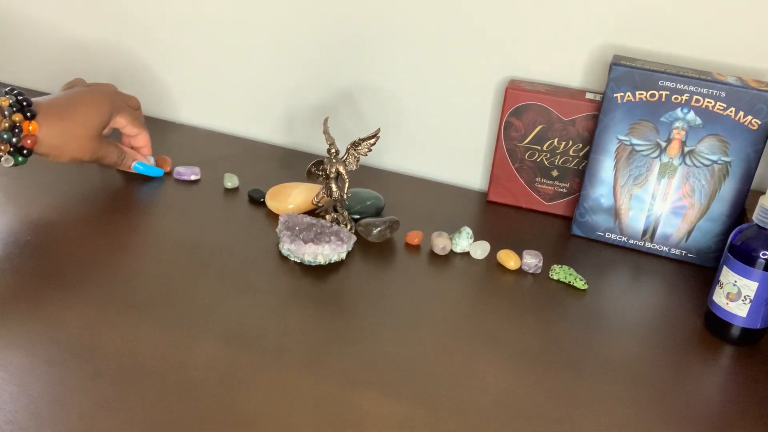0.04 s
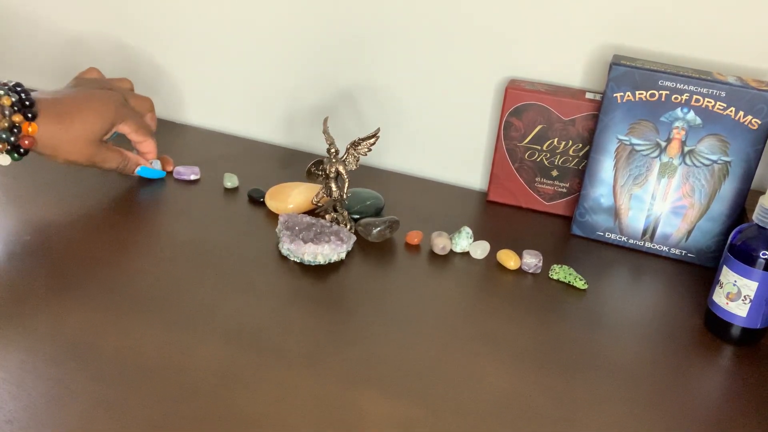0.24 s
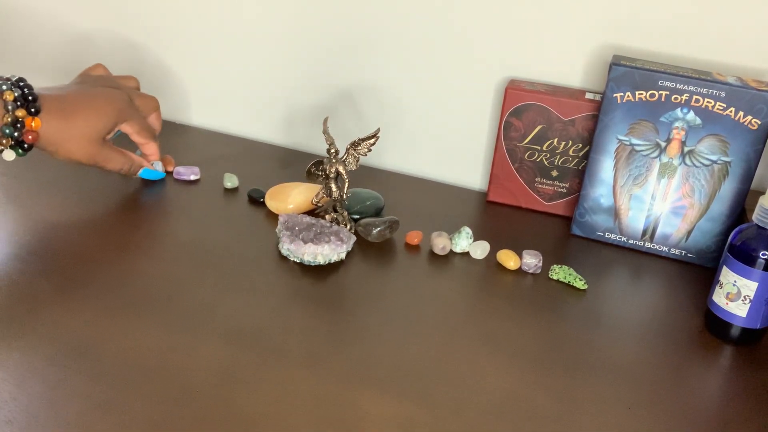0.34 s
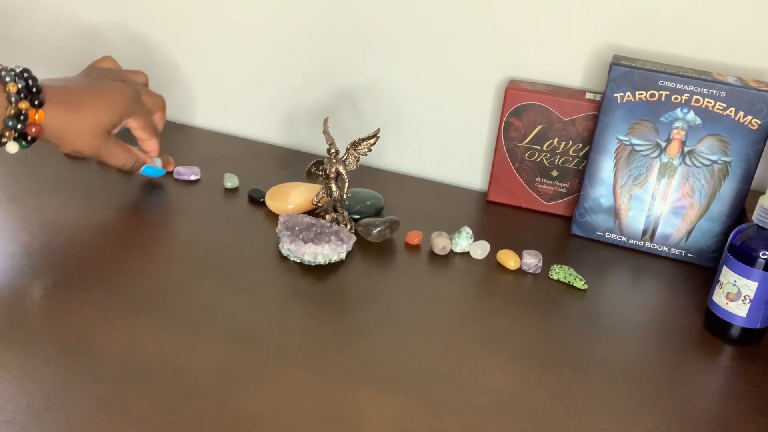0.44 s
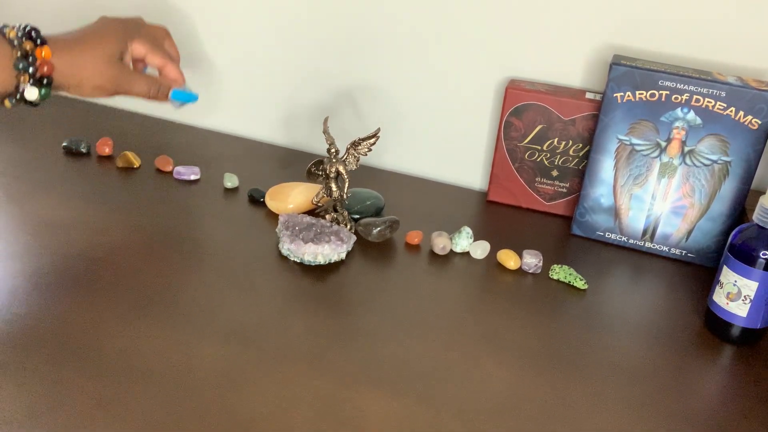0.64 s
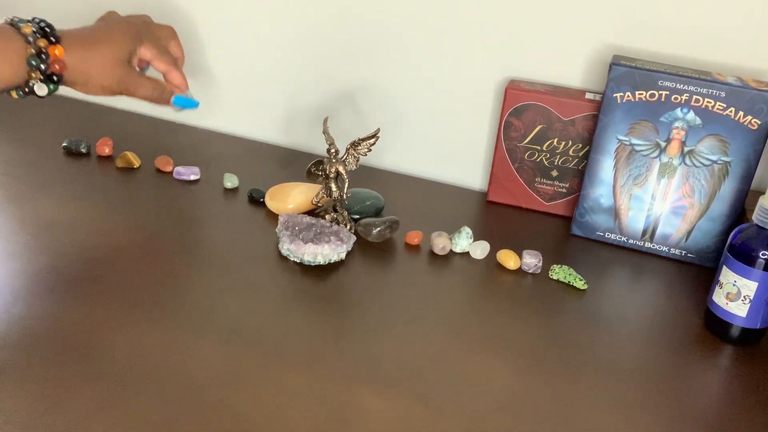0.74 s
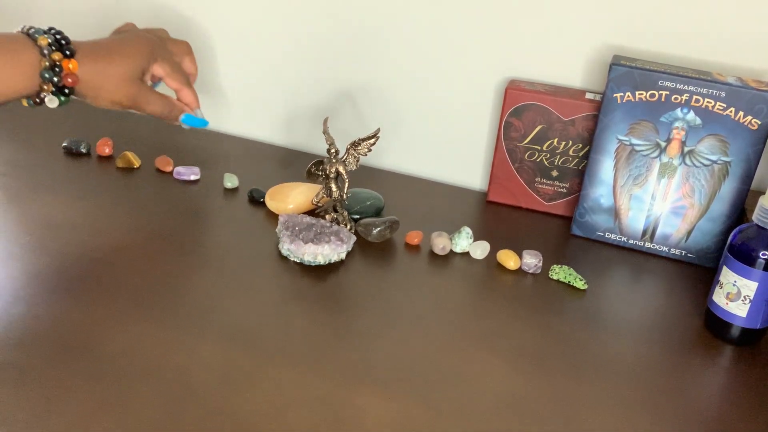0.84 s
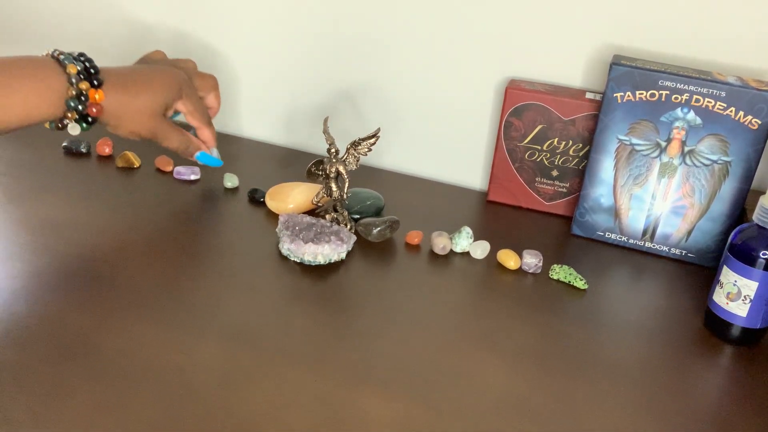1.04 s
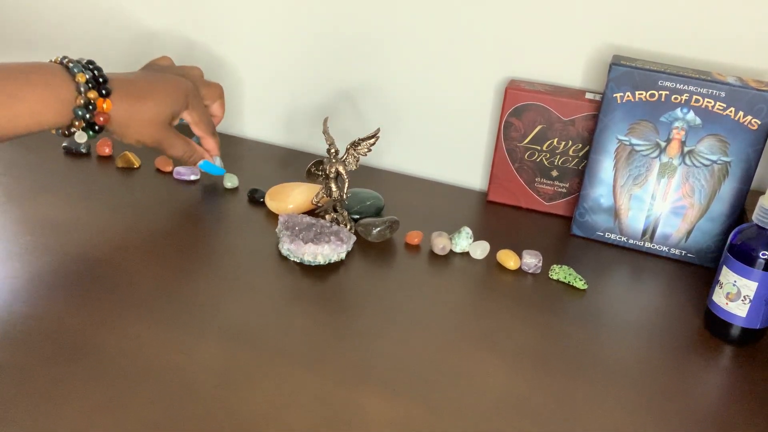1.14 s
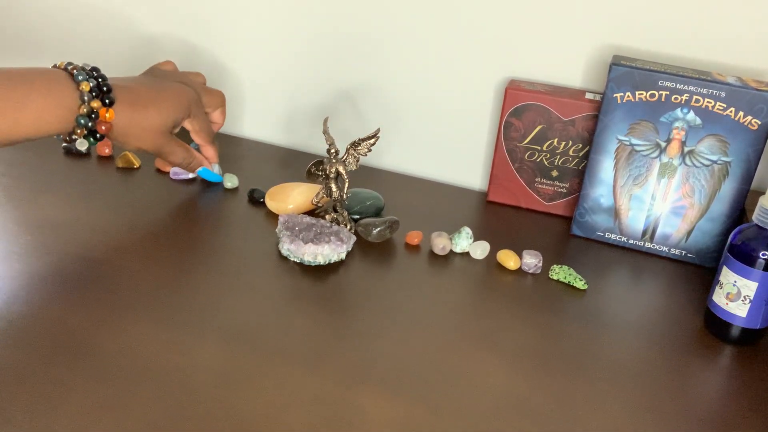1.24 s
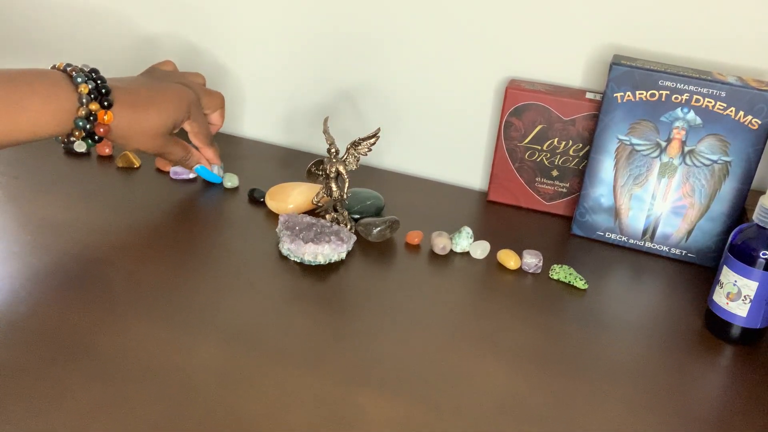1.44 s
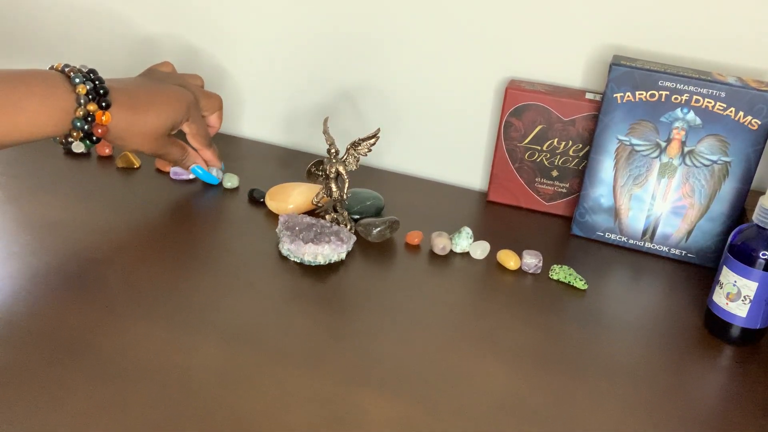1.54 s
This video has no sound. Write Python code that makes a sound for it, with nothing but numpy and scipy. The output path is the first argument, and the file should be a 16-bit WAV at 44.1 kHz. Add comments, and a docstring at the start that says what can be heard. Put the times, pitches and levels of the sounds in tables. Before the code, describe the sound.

A small polished stone clacks hard on a wooden desk, then is set down again indoors

```python
"""Over a low hum and air noise, fingers rub (slowly shaped noise) and tick (bright filtered impulses).
A polished stone then clacks on a wooden desk, lightly and then hard, and rattles down to faint contacts.
It is set down again, rattling to rest in a few contacts; near the end the hand settles with a soft thud.
Each contact is a minimum-phase click; each landing adds decaying desk modes; the heavy ones a low swell.
The quiet room answers with early reflections and a tail that decays at its own rate in each band."""
import sys
import numpy as np
from scipy import signal
from scipy.fft import rfft, irfft
from scipy.io import wavfile
from scipy.ndimage import uniform_filter1d

SR = 44100
rng = np.random.default_rng(int(sys.argv[2]) if len(sys.argv) > 2 else 0)


def file_out(sig):
    """Save sig as 16-bit WAV at sys.argv[1]."""
    # one column per channel
    cols = np.atleast_2d(sig).T
    # limit, then scale
    lim = np.clip(cols, -1, 1)
    pcm = np.round(lim * 32767).astype(np.int16)
    wavfile.write(sys.argv[1], SR, pcm)


N = 70560  # length in samples (1.6 s)


def amp(db):
    """Level: an amplitude ratio is ten to the power of decibels over twenty."""
    return 10 ** (np.asarray(db) / 20)


def evened(x):
    """Normalisation: dividing by the root mean square gives unit power."""
    return x / np.sqrt(np.mean(x ** 2) + 1e-20)


def read(points, hz, column=1):
    """Spectral envelope: a table column is interpolated along log frequency."""
    table = np.transpose(points)
    return np.interp(np.log(hz + 1), np.log(table[0] + 1), table[column])


def add(mix, start_s, sound):
    """Superposition: a sound is summed into the mix, in place, from its start time."""
    part = mix[round(start_s * SR):][:len(sound)]
    part += sound[:len(part)]


def ring(x, response):
    """Linear response: a sound is convolved with an impulse response."""
    return signal.fftconvolve(x, response)[:N]


def click(colour, cut_hz=SR, size=2048):
    """Minimum phase: the Hilbert transform of log gain gives the phase of a causal click."""
    hz = abs(np.fft.fftfreq(size, 1 / SR))
    softening = np.sqrt(1 + (hz / cut_hz) ** 8)  # a softer contact has a lower cut-off
    log_gain = np.log(amp(read(colour, hz)) / softening)
    spectrum = np.exp(np.conj(signal.hilbert(log_gain)))
    return np.fft.ifft(spectrum).real


def noise(colour):
    """Filtered noise: white noise is weighted by a spectral envelope and set to rms 1."""
    gain = amp(read(colour, np.fft.rfftfreq(N, 1 / SR)))
    return evened(irfft(rfft(rng.standard_normal(N)) * gain, N))


def dying(t, t60):
    """Exponential decay: the amplitude falls by 60 dB in each t60."""
    return np.exp(-np.log(1000) * t / t60)


def scatter(t60, delay_s):
    """Diffuse scattering: decaying impulses of random sign form a response of energy 1."""
    t = np.arange(SR // 2) / SR
    tail = rng.choice([-1., 1.], len(t)) * dying(t, t60) * (t > delay_s)
    return tail / np.linalg.norm(tail)


# Clicks of stone on wood as it rocks to rest.
# Each row: start in seconds, strength in dB, hardness as a cut-off in Hz.
STONE_CONTACTS = [(0.1101, 0, 13000), (0.11095, -15, 12000), (0.11706, -8.5, 7100), (0.1209, -5.5, 7160),
                  (0.2210, 18, 5900), (0.22422, 16.5, 5500), (0.22633, 15, 5030), (0.22694, 14, 8000),
                  (0.22771, 14, 5600), (0.22876, 15.5, 4960), (0.2298, 4, 4500), (0.23123, 19, 4490),
                  (0.23368, 7, 3800), (0.4796, -8, 3503), (0.48164, -11, 2800), (0.48708, -18.5, 2410),
                  (0.49232, -13.5, 2630), (0.49348, -9.5, 2240), (0.639, -26, 2970), (0.645, -29.5, 2210),
                  (0.719, -30, 3000), (0.799, -22, 2200), (0.894, -32, 4500), (0.933, -34, 2200),
                  (0.98, -33, 4496), (1.1929, 11, 6990), (1.1939, 1.5, 11000), (1.19916, 4, 6160),
                  (1.20122, 2, 5600), (1.2018, -1, 5450), (1.2087, 8.5, 6000), (1.2095, -3, 4400),
                  (1.21528, 3.5, 4500), (1.22054, 1, 4000), (1.2245, 4, 3800), (1.2266, -7, 3400),
                  (1.4810, -5.5, 2500), (1.4842, -11.5, 1900), (1.48501, -6, 1670), (1.4878, -11.5, 1700),
                  (1.4925, -3, 1600), (1.5808, -18, 2230)]
# Spectrum of one bare clack. Each row: frequency in Hz, level in dB.
CLACK_COLOUR = [(40, -50.5), (200, -24), (340, -12), (900, -9), (1500, -4), (2200, 0.5), (3100, -5),
                (4100, -9), (5100, -7.5), (6500, -18.5), (9000, -14), (12000, -23.5), (16000, -32.5)]
SCATTER_DB, SCATTER_T60_S, SCATTER_DELAY_S = -4, 0.025, 0.00037


def stone(paths=4):
    """Impact excitation: each contact is a click, and successive clicks take different room paths."""
    clacks = np.zeros((paths, N))
    for k, (start_s, db, hard_hz) in enumerate(STONE_CONTACTS):
        add(clacks[k % paths], start_s, amp(db) * click(CLACK_COLOUR, hard_hz))
    total = np.zeros(N)
    for clack in clacks:
        scattered = ring(clack, scatter(SCATTER_T60_S, SCATTER_DELAY_S))
        total += clack + amp(SCATTER_DB) * scattered + room(clack)
    return disperse(total)


# Bands that the wood holds back. Each row: centre frequency in Hz, width in Hz.
WOOD_DISPERSION = [(2250, 2800), (5000, 1200), (9000, 1100)]


def disperse(x):
    """Dispersion: all-pass sections delay some bands, spreading a sharp click into a few swings."""
    for hz, width_hz in WOOD_DISPERSION:
        radius = np.exp(-np.pi * width_hz / SR)
        poles = [1, -2 * radius * np.cos(2 * np.pi * hz / SR), radius * radius]
        x = signal.lfilter(poles[::-1], poles, x)
    return x


# The stone's weight lands on the desk. Each row: start in seconds, strength in dB, hardness as
# a cut-off in Hz, spot on the desk (rounded to an index 0 to 3; -4 also means spot 0).
DESK_LANDINGS = [(0.11, 1.5, 7000, 0.5), (0.2212, 23.5, 6540, 1), (0.479, -16, 2610, -4),
                 (0.4930, -4, 2100, 0), (1.1929, 13, 6850, 2), (1.4807, -3.5, 2400, 3),
                 (1.581, -10, 1600, 1.5)]
WOOD_ROOM_DB = -1.5  # room response to the ringing wood
BOOM_HZ, BOOM_RISE_S = 136.3, 0.029
BOOM_DB, BOOM_GROWTH = -50, 0.31  # level at strength 0 dB, and dB gained per dB of strength


def landings():
    """Modal excitation: landings ring the desk top; the heavy ones swell a low room resonance."""
    wood, boom = np.zeros((2, N))
    t = np.arange(SR // 2) / SR
    envelope = t / BOOM_RISE_S * np.exp(1 - t / BOOM_RISE_S)
    swell = envelope * np.sin(2 * np.pi * BOOM_HZ * t)
    flat = [(0, 0), (SR, 0)]
    for start_s, db, hard_hz, spot in DESK_LANDINGS:
        blow = click(flat, hard_hz)
        add(wood, start_s, amp(db) * signal.fftconvolve(blow, desk(round(spot))))
        if db > 6:
            add(boom, start_s, amp(BOOM_DB + BOOM_GROWTH * db) * swell)
    return disperse(wood + amp(WOOD_ROOM_DB) * room(wood)) + boom


# Modes of the desk top. Each row: frequency in Hz, t60 in seconds,
# then the level in dB at spots 0, 1, 2 and 3.
DESK_MODES = [(335, .08, -6.5, 2, 0.5, -12), (400, 0.054, -8.5, -2, -2.5, -16), (506, .08, -2.5, 1, 3.5, 5),
              (700, .06, -10, 1, -6.5, -2), (751, .25, 8, -9.5, 9, 12), (998, .07, -10, -2.5, -4, 2),
              (1163, .09, -12.5, -4, 5.5, 12.5), (1335, .09, 1, 3.5, 8.5, 7), (1539, .06, -0.5, 2, 0.5, 8),
              (1774, 0.13, 8.5, -2, 5, 8), (1870, .07, 7.5, 4.5, 6, -14), (2039, .07, 1.5, 11.5, -10, 3.5),
              (2282, .08, 7.5, 1.5, 11, -3), (2535, .07, 4.5, 2.5, -1, -6), (2838, .08, 4, 5.5, -10, -7),
              (3350, .08, 3.5, -3.5, 8.5, 2), (4904, .045, -8.5, 1, -11.5, -18)]


def desk(spot):
    """Modal superposition: decaying cosines are weighted by spot; neighbouring modes swing oppositely."""
    t = np.arange(SR // 2) / SR
    response = np.zeros(len(t))
    for k, (hz, t60, *spot_dbs) in enumerate(DESK_MODES):
        gain = (-1) ** k * amp(spot_dbs[spot])
        gain *= 2 * np.log(1000) / (t60 * SR)  # evens out the resonant gain of long and short modes
        response += gain * dying(t, t60) * np.cos(2 * np.pi * hz * t)
    return response


# Light ticks of fingernail and beads. Each row: start in seconds, level in dB.
TICK_EVENTS = [(0.124, -16), (0.1784, -35), (0.198, -32), (0.543, -42), (0.5573, -23), (0.639, -39),
               (0.657, -42), (0.666, -40), (0.731, -44.5), (0.799, -43.5), (0.866, -36.5), (0.895, -45),
               (0.9624, -38.5), (0.98, -40.5), (1.0795, -41), (1.105, -42.5), (1.3792, -30.5)]
# Spectrum of one tick. Each row: frequency in Hz, level in dB.
TICK_COLOUR = [(300, -29), (2000, -18), (5000, -16), (6800, -3.5), (10000, -0.5), (12500, -13.5),
               (16000, -30.5)]
TICK_RING_DB, TICK_RING_T60_S = -6.5, 0.015


def ticks():
    """Light impact: tiny bright clicks excite a brief diffuse ring."""
    out = np.zeros(N)
    for start_s, db in TICK_EVENTS:
        add(out, start_s, amp(db) * click(TICK_COLOUR))
    return out + amp(TICK_RING_DB) * ring(out, scatter(TICK_RING_T60_S, 0))


# Fingers rubbing. Each row: time in seconds, level in dB.
RUB_LEVEL = [(0, -62), (0.07, -57.5), (0.095, -53.5), (0.125, -44.5), (0.2, -61), (0.5, -62), (0.65, -73),
             (0.98, -75), (1.03, -104), (1.17, -76.5), (1.38, -56), (1.46, -64), (1.6, -60.5)]
# Spectrum of the rubbing. Each row: frequency in Hz, level in dB.
RUB_SPECTRUM = [(100, -22.5), (500, -1), (800, 7.5), (2100, 1.5), (3500, -10), (6000, -23), (10000, -23.5),
                (16000, -42)]
THUD_S, THUD_HZ, THUD_DB = 1.588, 190, -39  # the hand settles on the desk
THUD_RISE_S, THUD_T60_S = 0.007, 0.15


def hand():
    """Friction and damped oscillation: rubbing is shaped noise, the settling hand a decaying sine."""
    t = np.arange(N) / SR
    out = noise(RUB_SPECTRUM) * amp(np.interp(t, *np.transpose(RUB_LEVEL)))
    envelope = np.minimum(t / THUD_RISE_S, 1) * dying(t, THUD_T60_S)
    add(out, THUD_S, amp(THUD_DB) * envelope * np.sin(2 * np.pi * THUD_HZ * t))
    return out


# Spectrum of bracelet beads and skin. Each row: frequency in Hz, level in dB.
RUSTLE_COLOUR = [(200, -10.5), (1000, -1), (2500, -0.5), (5000, -8), (9000, -8.5), (12000, -18.5),
                 (16000, -32)]
RUSTLE_PER_S, RUSTLE_SPREAD_DB, RUSTLE_DB = 45, 3.5, -78.5  # mean rate, size spread, rms level


def rustle():
    """Random point process: sparse grains of uneven size make very faint crackles."""
    sizes = amp(RUSTLE_SPREAD_DB * np.minimum(rng.exponential(1, N), 2))
    grains = (rng.random(N) < RUSTLE_PER_S / SR) * sizes
    crackle = ring(grains, click(RUSTLE_COLOUR))
    return amp(RUSTLE_DB) * evened(ring(crackle, scatter(TICK_RING_T60_S, 0)))


# Reverberation of the room. Each row: frequency in Hz, t60 in seconds, level in dB.
ROOM_BANDS = [(129.7, 1, -7), (350, 0.52, -10.5), (850, 0.51, -6.5), (1800, 0.46, -9.5), (3200, .48, -13),
              (5200, .5, -15), (8100, 0.41, -11), (14000, .3, -13.5)]
ROOM_DELAY_S, EARLY_DB, EARLY_T60_S = 0.0063, -11.5, 0.22


def room(x, size=256):
    """Reverberation: early reflections join a diffuse tail with its own decay in each band."""
    hz, t, bands = signal.stft(rng.standard_normal(SR), SR, nperseg=size)
    t60 = read(ROOM_BANDS, hz)[:, None]
    level = amp(read(ROOM_BANDS, hz, column=2))[:, None]
    energy_scale = np.sqrt(2 * np.log(1000) / (t60 * SR))  # equal energy for any t60
    tail = signal.istft(bands * dying(t, t60) * level * energy_scale, SR, nperseg=size)[1]
    tail = tail * (np.arange(len(tail)) / SR > ROOM_DELAY_S)
    early = scatter(EARLY_T60_S, ROOM_DELAY_S)
    return ring(x, tail) + amp(EARLY_DB) * ring(x, early)


# Rumble and hiss of the room. Each row: frequency in Hz, relative level in dB per Hz.
AIR_COLOUR = [(12, -28.5), (20, 5), (58, -11.5), (70, -21), (130, -23), (198, -31.5), (228, -25.5),
              (270, -28.5), (367, -27), (849, -39.5), (1000, -43), (1220, -45.5), (3630, -56.5),
              (9140, -59.5), (16000, -71)]
AIR_DB = -44.5
# Hum tones. Each row: mean frequency in Hz, rms level in dB.
HUM_TONES = [(47, -53.5), (118, -62.5), (140, -62)]
HUM_WAVER_HZ, HUM_WAVER_S = 1.5, 0.18  # rms frequency deviation, smoothing time


def background():
    """Frequency modulation: smoothed noise wavers the hum tones over steady coloured noise."""
    out = amp(AIR_DB) * noise(AIR_COLOUR)
    for hz, db in HUM_TONES:
        waver = evened(uniform_filter1d(rng.standard_normal(N), int(HUM_WAVER_S * SR)))
        cycles = np.cumsum(hz + HUM_WAVER_HZ * waver) / SR + rng.random()
        out += amp(db) * evened(np.sin(2 * np.pi * cycles))
    return out


def scene():
    """Superposition: stone, desk, ticks, hand and background add linearly."""
    light = disperse(ticks())
    mix = stone() + landings() + light + room(light) + hand() + rustle() + background()
    return mix[None]


CEILING, EDGE_HZ = 1.05, 16200  # peak amplitude approached, upper band edge


def record(dry):
    """Saturation and band limiting: high peaks are rounded off, then a low-pass filter follows."""
    rounded = dry / (1 + (dry / CEILING) ** 4) ** (1 / 4)
    low_pass = signal.firwin(511, EDGE_HZ, window=("kaiser", 9), fs=SR)
    return signal.oaconvolve(rounded, low_pass[None], "same")


dry = scene()
out = record(dry)
file_out(out)
```